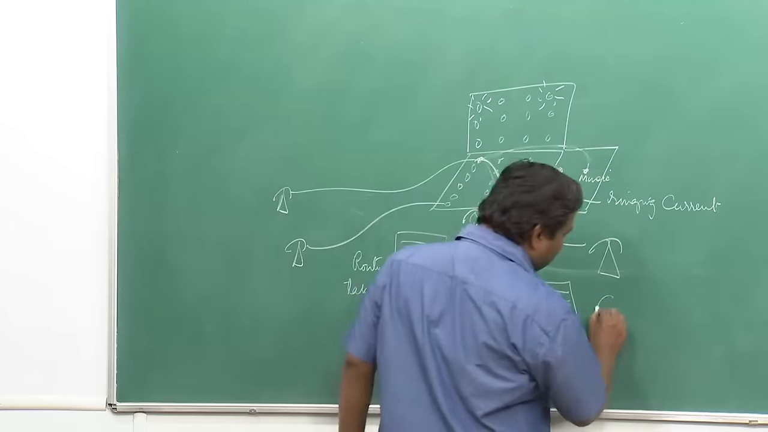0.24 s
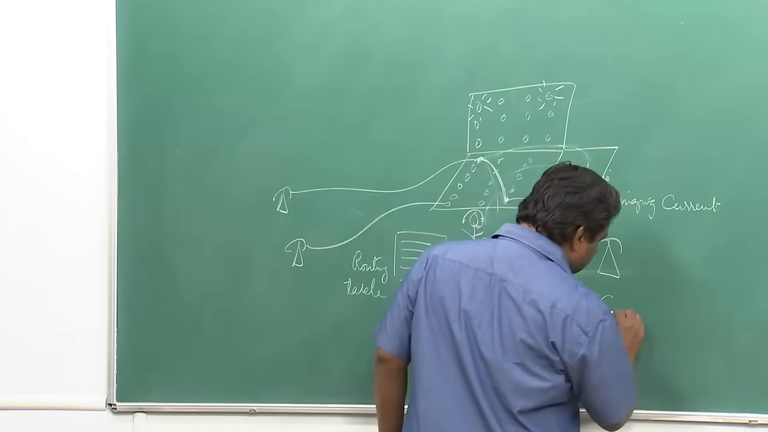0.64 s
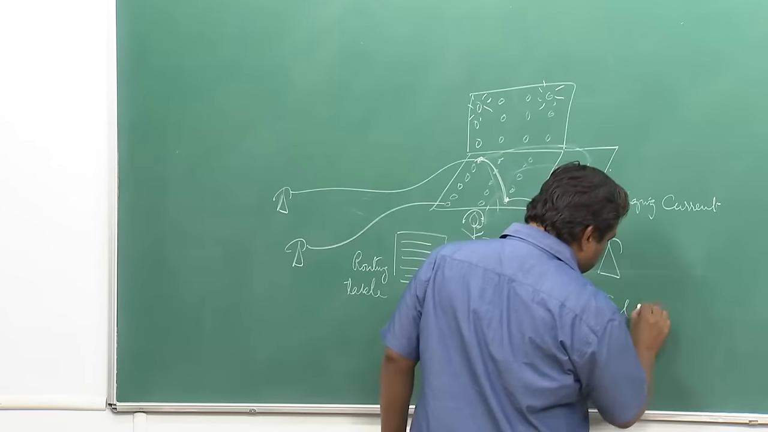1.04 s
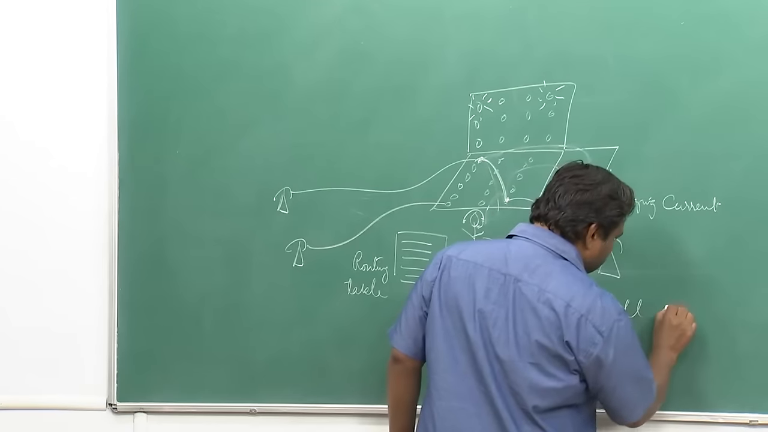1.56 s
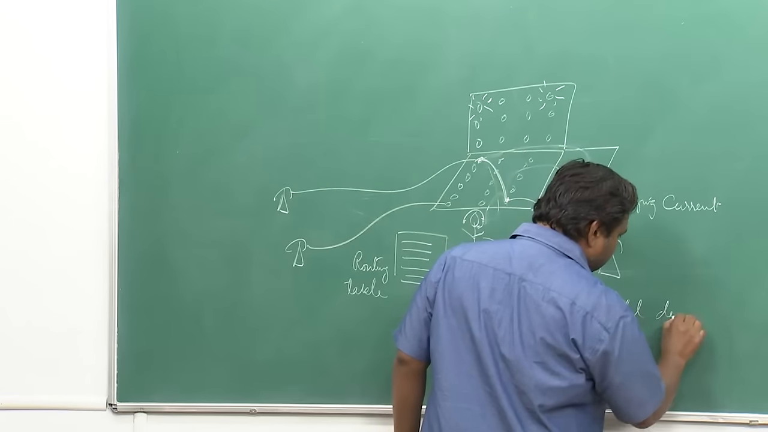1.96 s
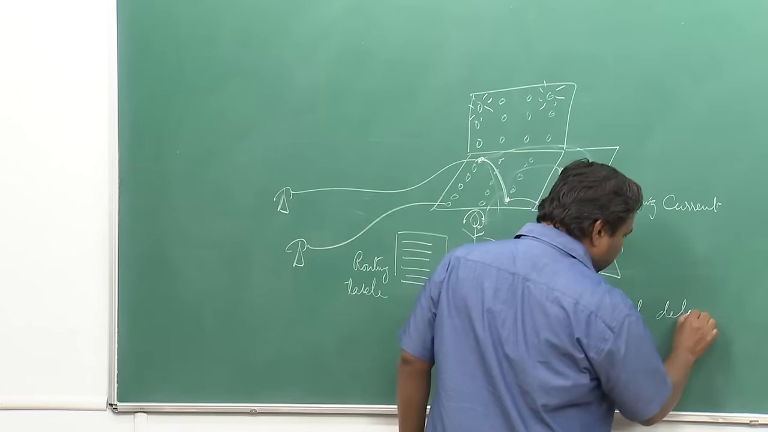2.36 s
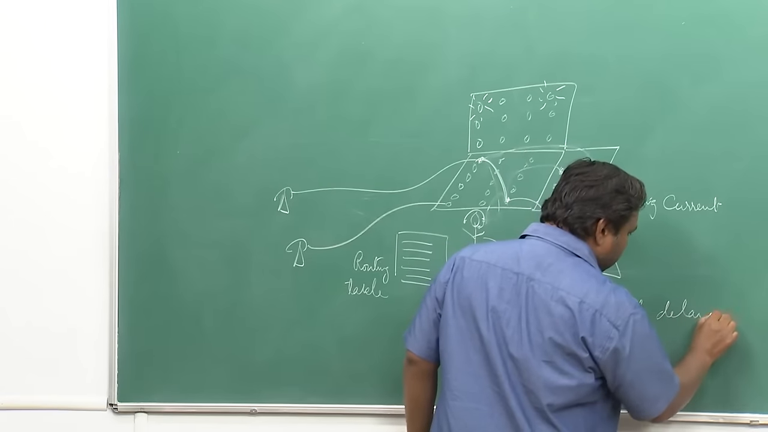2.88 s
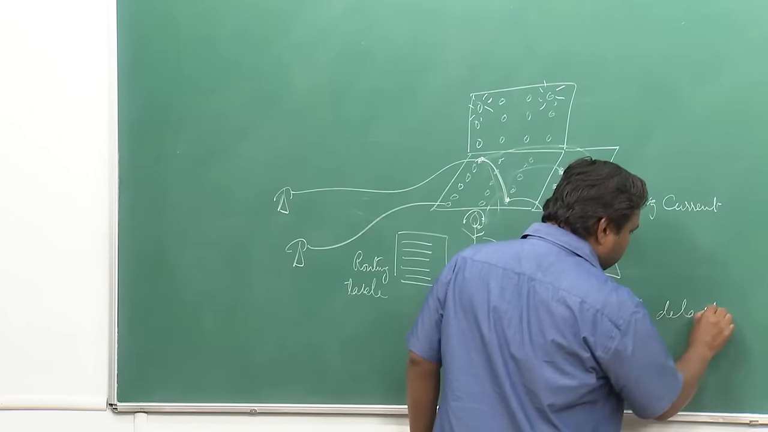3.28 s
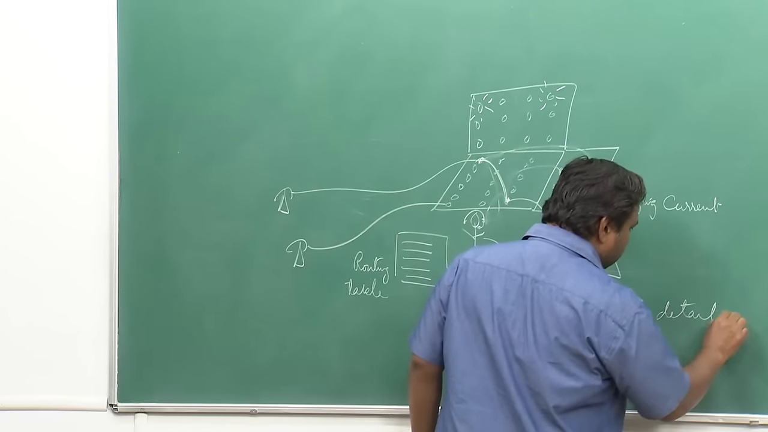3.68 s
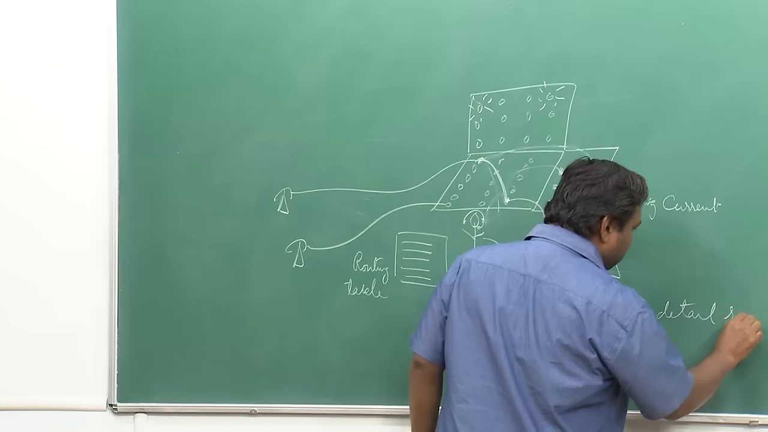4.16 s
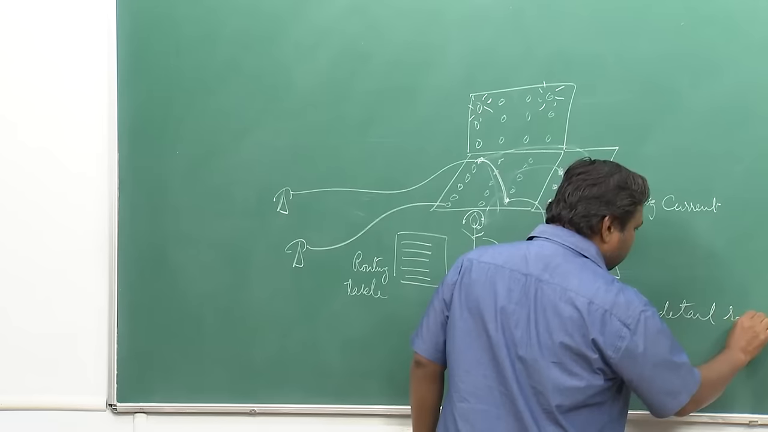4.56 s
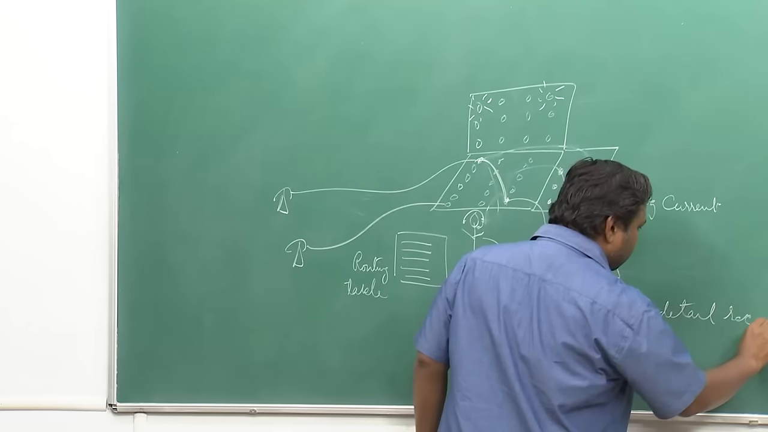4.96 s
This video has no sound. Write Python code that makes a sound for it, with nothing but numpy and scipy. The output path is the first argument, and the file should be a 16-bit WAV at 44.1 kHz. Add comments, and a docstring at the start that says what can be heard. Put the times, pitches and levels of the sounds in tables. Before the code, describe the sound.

Close, dry chalk scratches and clicking taps on a wall board in a quiet room, with soft air noise and low hum underneath.

```python
"""A quiet classroom, where someone writes a few words with chalk on a wall board.
Each push swells and fades with the hand's speed: a dense run of tiny slips shakes the board,
hissy on the way up, raspy on the way down. Quick flicks chirp as the stick tilts,
and the stick taps where it lands hard: a click, a falling bending wave, a short ring and a thump.
The room answers briefly with sparse reflections, over ventilation of soft air noise and low hum."""
import sys
import numpy as np
from scipy import signal
from scipy.fft import rfft, irfft
from scipy.io import wavfile

SR = 44100
rng = np.random.default_rng(int(sys.argv[2]) if len(sys.argv) > 2 else 0)


def put_to_file(sound):
    """Save the sound as 16-bit audio at rate SR, in the file named by the first command-line argument."""
    columns = np.atleast_2d(sound).T  # one column per channel
    safe = np.clip(columns, -1, 1)
    whole_steps = np.round(safe * 32767)
    wavfile.write(sys.argv[1], SR, whole_steps.astype(np.int16))


N = 230422


def gain_of(db):
    """Decibels to amplitude."""
    return 10 ** (np.asarray(db) / 20)


def evened(x):
    """Scales to rms 1."""
    return x / np.sqrt(np.mean(x ** 2) + 1e-20)


def unit_energy(x):
    """Scales to energy 1."""
    return x / np.linalg.norm(x)


def read(points, hz):
    """Reads a table on a log-frequency axis."""
    f, value = np.transpose(points)
    return np.interp(np.log(hz + 1), np.log(f + 1), value)


def add(mix, s, sound):
    """Mixes a sound in at time s."""
    part = mix[max(round(s * SR), 0):][:len(sound)]
    part += sound[:len(part)]


def colour(x, points):
    """Minimum-phase filter with the tabled spectrum, so attacks stay sharp."""
    hz = abs(np.fft.fftfreq(4096, 1 / SR))
    log_gain = np.log(gain_of(read(points, hz)))
    taps = np.fft.ifft(np.exp(np.conj(signal.hilbert(log_gain)))).real
    return signal.fftconvolve(x, taps[:len(taps) // 2])[:len(x)]


def glide(x, centre_hz, shape):
    """A resonance of the given shape whose centre follows a curve, rms 1."""
    hz, t, z = signal.stft(x, SR, nperseg=256, noverlap=192)
    centre = np.interp(t * SR, np.arange(len(x)), centre_hz)
    multiple, db = np.transpose(shape)
    gain = gain_of(np.interp(hz[:, None] / centre, multiple, db))
    z = z * gain / np.sqrt(centre)  # a higher centre passes a wider band
    return evened(signal.istft(z, SR, nperseg=256, noverlap=192)[1][:len(x)])


# The stick's resonance against the board. Each row: multiple of its centre, relative level in dB.
STICK_SHAPE = [(.25, -44.5), (.45, -28), (.65, -11), (.85, -3.5), (1, -3), (1.18, -5), (1.45, -13.5),
               (2.1, -27.5), (4, -46)]
# Fixed voices of a stroke: board rasp, edge hiss, powder fizz.
# Each row: frequency in Hz, relative level in dB.
RASP_SHAPE = [(120, -30), (300, -15), (600, -9), (950, 0), (1150, 0), (1400, -2), (1850, -1), (2300, -5),
              (3200, -22), (6000, -55)]
HISS_SHAPE = [(2200, -20.5), (3400, -12.5), (4400, -2), (5400, 1), (6500, -1), (8500, -5), (10000, -9),
              (11500, -15.5), (15000, -26.5)]
FIZZ_SHAPE = [(6500, -42), (9000, -18), (10500, -23), (12000, 2), (13500, 13), (14800, 10.5), (15700, 12.5)]
# The stick's resonance at its usual tilt; tilting it moves the resonance and trades rasp for hiss and fizz.
USUAL_TILT_HZ = 2803
# Each voice against the scrape: at the usual tilt and full speed, per octave of tilt,
# and per second as the hand works along the board.
RASP_DB, RASP_DB_PER_OCTAVE, RASP_DB_PER_S = -14, -35, 0.08
HISS_DB, HISS_DB_PER_OCTAVE, HISS_DB_PER_S = -13, 36, 0.75
FIZZ_DB, FIZZ_DB_PER_OCTAVE, FIZZ_DB_PER_S = -13.5, 33, -0.1
SLOW_DULL_DB = -5  # hiss and fizz drop this much further as the chalk comes to rest
SPEED_POWER = 1.244  # amplitude grows as this power of speed
# Pushes of the chalk; upstrokes are high and hissy, downstrokes low and raspy.
# Each row: start in seconds, speeding up in seconds, slowing down in seconds,
# level of the scrape at full speed in dB, stick resonance from Hz, to Hz,
# extra rasp in dB, extra hiss in dB, extra fizz in dB.
PUSHES = [(0.142, 0.006, 0.086, -36.5, 2460, 3700, 1.5, -10.5, -13),
          (0.172, 0.047, 0.14, -49.5, 3210.0, 2980.0, 1.5, -2, 6.5),
          (0.24, 0.004, 0.046, -49.5, 3030, 3010.0, 0, -13, -2),
          (0.302, 0.055, 0.104, -50, 3210.0, 2070, 0.5, -4.5, 3),
          (0.437, 0.023, 0.063, -48.0, 2810, 3230, -6.0, -6.5, 0.0),
          (0.538, 0.035, 0.047, -51.0, 2720, 2530, 3, -5, 2),
          (0.639, 0.045, 0.12, -57, 3080, 2770, -4.0, -1.5, 4.0),
          (0.723, 0.06, 0.086, -45, 2930.0, 2230, -7, 4.0, 7),
          (0.866, 0.046, 0.13, -52, 3380, 3350, 8.5, -6, -4),
          (0.994, 0.081, 0.046, -44, 2940.0, 2370, -4, 3.5, 6.5),
          (1.126, 0.05, 0.13, -54.0, 3600, 2970, 6, -4.5, -0.5),
          (1.4, 0.013, 0.11, -53, 2840, 2590, -15, 2, -2),
          (1.497, 0.1, 0.043, -46.0, 2940, 2360, -4, 4.5, 4),
          (1.65, 0.044, 0.14, -53.5, 3270, 3160, 6, -1.5, -1),
          (1.775, 0.048, 0.046, -52.5, 2810, 2140, -2.5, 6, 2),
          (1.882, 0.024, 0.071, -57.5, 2900, 3290.0, -10, -1, -5),
          (1.942, 0.13, 0.048, -46, 3060, 2320, -3.5, 2.5, 4.0),
          (2.124, 0.028, 0.16, -52.0, 3190, 3330, 4, 0, -3),
          (2.239, 0.081, 0.016, -48, 3040.0, 2260, -1.5, -0.5, 2.0),
          (2.349, 0.0045, 0.092, -53.5, 2690, 3280.0, 0, 1.0, -7),
          (2.418, 0.081, 0.046, -55, 2720, 2310, -1, 6.5, -1),
          (2.551, 0.051, 0.078, -60.5, 3340, 2840, -2, 0, -7),
          (2.64, 0.073, 0.031, -50, 2980, 2300, 6, 0.5, 1.0),
          (2.743, 0.087, 0.075, -55.5, 3180, 3240, 4, -4, -8),
          (2.831, 0.093, 0.067, -45.0, 2800, 2500, -0.5, 5, 2.0),
          (3.009, 0.0074, 0.088, -58, 2940, 3560.0, -7, 3.5, 2.0),
          (3.051, 0.052, 0.1, -54.5, 4080, 2550, 14, -4.5, -8),
          (3.459, 0.037, 0.032, -45.5, 3690, 2850, 5, -4, -1.0),
          (3.748, 0.041, 0.078, -45.5, 2780, 2600, 1.5, 2, -3),
          (3.893, 0.0095, 0.041, -51.0, 2820, 3290.0, 4.5, -2.0, -2),
          (3.923, 0.055, 0.097, -58.5, 3280, 3370, -10, -2.0, -4),
          (4.063, 0.06, 0.063, -39.5, 2770, 2070, -5.5, -1.5, -2.0),
          (4.171, 0.051, 0.072, -53.5, 2580, 3310.0, -5.0, -1, -3),
          (4.256, 0.095, 0.064, -45, 2890.0, 2480, 2, -0.5, 0),
          (4.432, 0.05, 0.03, -53, 3240, 2530.0, -4, -1.5, 0.0),
          (4.526, 0.028, 0.067, -48.5, 2680, 2010.0, 3, -5.5, -1.0),
          (4.582, 0.035, 0.141, -46, 2620, 3720.0, 2, -2.5, -5),
          (4.707, 0.082, 0.045, -44.0, 3150, 2110, -2, 4.5, 2.0),
          (4.852, 0.018, 0.077, -47, 3040.0, 3220, 3.5, -2.5, -5),
          (4.932, 0.087, 0.04, -49, 2550, 2480, 3, 1.0, 0),
          (5.051, 0.049, 0.062, -50.5, 3050, 2960, 2, -1.0, 0),
          (5.184, 0.01, 0.048, -46, 2270, 2700, -2.5, 2.5, -1)]


def stroke(start_s, rise_s, fall_s, level_db, from_hz, to_hz, rasp_db, hiss_db, fizz_db):
    """One push: speed follows an arch and sets loudness; the stick's tilt slides and sets colour."""
    t = np.arange(0, rise_s + fall_s, 1 / SR)
    arch = np.interp(t, [0, rise_s, rise_s + fall_s], [0, .5, 1])
    speed = abs(np.sin(np.pi * arch))
    stick_hz = np.linspace(from_hz, to_hz, len(t))
    tilt_octaves = np.log2(stick_hz / USUAL_TILT_HZ)
    dull_db = SLOW_DULL_DB * (1 - speed)

    # half a second of slips; only the end is heard, once the board is shaking
    drive = slips(count=SR // 2, per_s=6000, size_db=2.5, judder_db=1.83, judder_s=0.0049)
    shaken = shake(drive)
    sound = glide(shaken[-len(t):], stick_hz, STICK_SHAPE)

    rasp_db = rasp_db + RASP_DB + RASP_DB_PER_OCTAVE * tilt_octaves + RASP_DB_PER_S * start_s
    hiss_db = hiss_db + HISS_DB + HISS_DB_PER_OCTAVE * tilt_octaves + HISS_DB_PER_S * start_s + dull_db
    fizz_db = fizz_db + FIZZ_DB + FIZZ_DB_PER_OCTAVE * tilt_octaves + FIZZ_DB_PER_S * start_s + dull_db
    for shape, db in [(RASP_SHAPE, rasp_db), (HISS_SHAPE, hiss_db), (FIZZ_SHAPE, fizz_db)]:
        voice = evened(colour(shaken, shape)[-len(t):])
        sound = sound + gain_of(db) * voice
    return start_s, gain_of(level_db) * speed ** SPEED_POWER * sound


def slips(count, per_s, size_db, judder_db, judder_s):
    """Tiny fractures of the chalk tip: random sizes, swelling as the stick catches and lets go."""
    size = gain_of(size_db * np.minimum(rng.exponential(1, count), 5))
    size = size * rng.choice([-1, 1], count)
    happens = rng.random(count) < per_s / SR
    memory = np.exp(-1 / (judder_s * SR))
    catch = evened(signal.lfilter([1], [1, -memory], rng.standard_normal(count)))
    return size * happens * gain_of(judder_db * catch)


def shake(drive, waves_db=-2, ring_db=-15):
    """Slips shake the board at one spot: the direct push, returning waves and a little ring."""
    spot = gain_of(waves_db) * scatter(decay_s=0.0079)
    spot[0] += 1
    shaken = signal.fftconvolve(drive, spot)[:len(drive)]
    ring = signal.fftconvolve(shaken, board_ring(spread=0.015))[:len(drive)]
    return shaken + gain_of(ring_db) * ring


def scatter(decay_s):
    """Bending waves return from the board's frame as a short dense cluster, energy 1."""
    t = np.arange(SR // 12) / SR
    return unit_energy(rng.standard_normal(len(t)) * np.exp(-t / decay_s))


# Board modes. Each row: frequency in Hz, relative level in dB, 60 dB decay time in seconds.
BOARD_MODES = [(1076, -16, 0.15), (1128, -2.5, 0.086), (1350, 3.5, 0.028), (1676, -3.5, 0.066),
               (1750, 6.5, 0.056), (1933, 3, 0.081), (2030, -3, 0.2), (2140, 4.5, 0.021), (2330, 3, 0.029),
               (2900, -4.5, 0.12), (3440, -29, 0.086), (4150, -4.5, 0.074), (4906, 3, 0.029)]


def board_ring(spread):
    """The board's answer to one push, energy 1; each spot shifts the modes a little differently."""
    t = np.arange(SR // 8) / SR
    ring = np.zeros(len(t))
    for hz, db, t60 in BOARD_MODES:
        mode_hz = hz * (1 + spread * rng.standard_normal())
        cycles = mode_hz * t + rng.random()
        ring += gain_of(db - 60 * t / t60) * np.sin(2 * np.pi * cycles)
    return unit_energy(ring)


# Quick flicks sweep the resonance as the stick tilts.
# Each row: start in seconds, length in seconds, from Hz, to Hz, level before the fades in dB.
TILT_FLICKS = [(0.139, 0.026, 1490, 2500, -47), (.146, .085, 3180, 3320, -42),
               (1.228, 0.041, 3400, 1170, -52.5), (3.136, 0.0273, 3340, 1290, -50),
               (3.495, .036, 3040, 1190, -47)]


def flick(s, length_s, from_hz, to_hz, db):
    """A short chirp: friction noise rings a narrow, sliding resonance."""
    count = round(length_s * SR)
    # each row: multiple of the centre, relative level in dB
    narrow = [(.3, -28), (.65, -6), (1, 4.5), (1.35, -14.5), (2.5, -30)]
    chirp = glide(rng.standard_normal(count), np.linspace(from_hz, to_hz, count), narrow)
    return s, gain_of(db) * chirp * signal.windows.tukey(count, .5)


# The click of a landing. Each row: frequency in Hz, relative level in dB.
CLICK_SHAPE = [(100, -43), (400, -17.5), (800, -7), (1200, -9.5), (1900, 0), (2800, 0.5), (3600, -8),
               (5300, -8), (7500, -21), (11000, -21.5), (16000, -5.5)]
# The whole board gives under a landing.
# Each row: frequency in Hz, level against the unfiltered click in dB, 60 dB decay time in seconds.
BOARD_SWAY = [(84, -38, 0.38), (185, -36, 0.029), (340, -36.5, 0.029)]
# The stick lands. Each row: start in seconds, gain in dB,
# then the band that the contact excites: low edge in Hz, high edge in Hz.
LANDINGS = [(0.1385, -6, 300, 2170), (1.3499, -0.5, 1010, 2960), (3.2455, 1.5, 480, 4370),
            (3.4442, -0.5, 990, 3840), (3.7119, -3, 656, 2850), (0.753, -20, 1300, 5000),
            (2.135, -25, 910, 5000), (2.354, -28.5, 900, 5500), (3.017, -32, 1200, 6000),
            (3.781, -16.5, 700, 4030), (4.113, -20, 700, 4000), (4.794, -16, 704, 3500),
            (4.861, -29, 900, 5000), (5.1909, -21, 700, 3020)]


def tap(s, db, low_hz, high_hz, echo_s=0.001914, echo_db=2, ring_db=-13, scatter_db=4, bend_db=-15):
    """A click and its quick reflection, a falling bending wave, and the board's short ring and thump."""
    ring = board_ring(spread=0.0013)
    t = np.arange(len(ring)) / SR
    push = np.zeros(len(t))
    push[0] = 1
    add(push, echo_s, gain_of([echo_db]))
    add(push, .0004, gain_of(scatter_db) * scatter(decay_s=0.0058))
    click = unit_energy(colour(push, CLICK_SHAPE))

    # treble crosses the board faster than bass, so the wave arrives as a falling chirp, by several paths
    bend_hz = 1250 + 1900 * np.exp(-t / 0.0051)
    bend = np.sin(2 * np.pi * np.cumsum(bend_hz) / SR) * t * np.exp(-t / 0.004)
    bend = unit_energy(signal.fftconvolve(bend, scatter(decay_s=0.0062))[:len(t)])

    contact = click + gain_of(ring_db) * ring + gain_of(bend_db) * bend
    contact = signal.lfilter(*signal.butter(2, low_hz, "highpass", fs=SR), contact)
    contact = signal.lfilter(*signal.butter(2, high_hz, fs=SR), contact)

    thump = np.zeros(len(t))
    for hz, mode_db, t60 in BOARD_SWAY:
        mode = np.sin(2 * np.pi * hz * t) * gain_of(-60 * t / t60)
        thump += gain_of(mode_db) * unit_energy(mode)
    return s, gain_of(db) * (contact + thump)


# Room decay. Each row: frequency in Hz, 60 dB decay time in seconds.
ROOM_DECAY = [(200, 0.19), (1000, 0.28), (2500, 0.32), (5000, 0.33), (9000, 0.19), (15000, 0.13)]
# What the walls send back. Each row: frequency in Hz, relative level in dB.
WALL_COLOUR = [(200, -5), (700, -2.5), (1300, -8.5), (1900, -2.5), (2700, -1.5), (3900, 3), (5000, -3),
               (8000, -6.5), (15000, -11)]


def room(x, first_s=.011):
    """Sparse reflections of random sign, each band dying at its own speed."""
    bounces = rng.choice([-1., 1.], SR) * (rng.random(SR) < 3000 / SR)
    hz, t, z = signal.stft(bounces, SR, nperseg=256)
    fade_db = read(WALL_COLOUR, hz)[:, None] - 60 * t / read(ROOM_DECAY, hz)[:, None]
    tail = signal.istft(z * gain_of(fade_db), SR, nperseg=256)[1]
    tail = np.concatenate([np.zeros(round(first_s * SR)), unit_energy(tail)])
    return signal.fftconvolve(x, tail)[:N]


# Rushing air. Each row: frequency in Hz, relative level in dB.
AIR_SHAPE = [(22, -54), (33, -37), (48, -0.5), (62, 4), (100, 6.5), (150, -6.5), (260, -12.5), (650, -12.5),
             (1300, -9.5), (2600, -14.5), (5000, -21.5), (9000, -28), (13500, -27.5), (15000, -33)]
# Ventilation hum. Each row: frequency in Hz, width in Hz, rms level in dB.
HUM_TONES = [(86.2, 3.7, -79), (135, 3.7, -94), (193.9, 4.3, -80)]


def ventilation(air_db=-65):
    """Soft rushing air as shaped noise, and low tones that waver because they are narrow noise bands."""
    hz = np.fft.rfftfreq(N, 1 / SR)

    def noise(shape):
        return evened(irfft(rfft(rng.standard_normal(N)) * shape, N))

    sound = gain_of(air_db) * noise(gain_of(read(AIR_SHAPE, hz)))
    for tone_hz, width_hz, db in HUM_TONES:
        sound += gain_of(db) * noise(np.exp(-((hz - tone_hz) / width_hz) ** 2))
    return sound


# Left minus right. Each row: frequency in Hz, level difference in dB.
LEFT_OVER_RIGHT = [(60, 1.55), (2500, 1.45), (5000, 1.43), (8000, 0.07), (14000, 0.9)]


def scene():
    """Strokes, flicks and taps in the room over ventilation: one mono sound, a little louder on the left."""
    writing, landings = np.zeros(N), np.zeros(N)
    for row in PUSHES:
        add(writing, *stroke(*row))
    for row in TILT_FLICKS:
        add(writing, *flick(*row))
    for row in LANDINGS:
        add(landings, *tap(*row))
    reflections = room(gain_of(-17.5) * writing + gain_of(-15.5) * landings)
    mono = writing + landings + reflections + ventilation()
    side_db = read(LEFT_OVER_RIGHT, np.fft.rfftfreq(N, 1 / SR)) / 2
    return irfft(rfft(mono) * gain_of([side_db, -side_db]), N)


EDGE_HZ = 15850  # low-pass cut-off in Hz; the sound holds almost nothing above it


def record(dry):
    """A steep linear-phase low-pass takes away the extreme treble on both channels."""
    low_pass = signal.firwin(511, EDGE_HZ, window=("kaiser", 9), fs=SR)
    return signal.oaconvolve(dry, low_pass[None], "same")


dry = scene()
out = record(dry)
put_to_file(out)
```